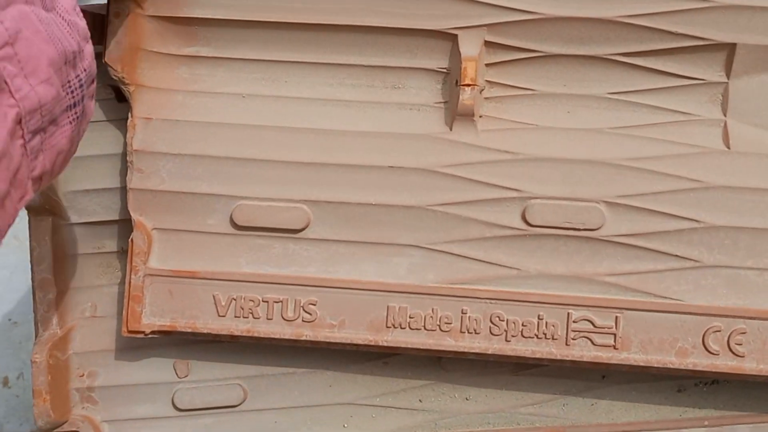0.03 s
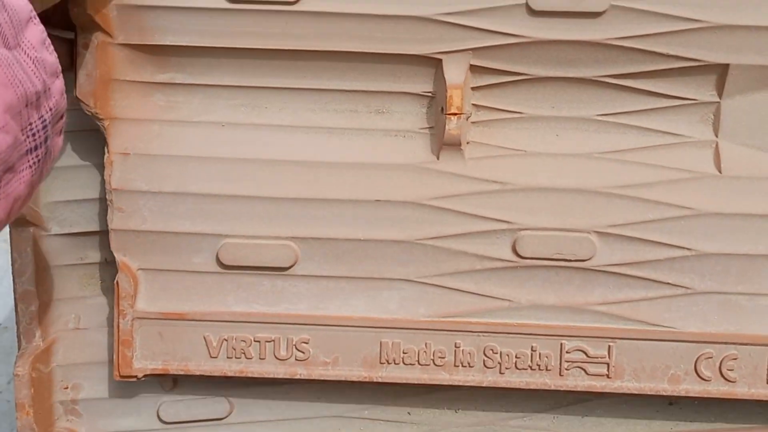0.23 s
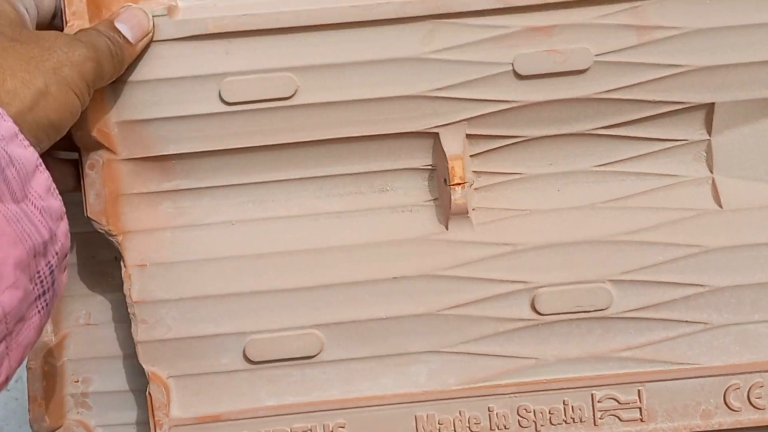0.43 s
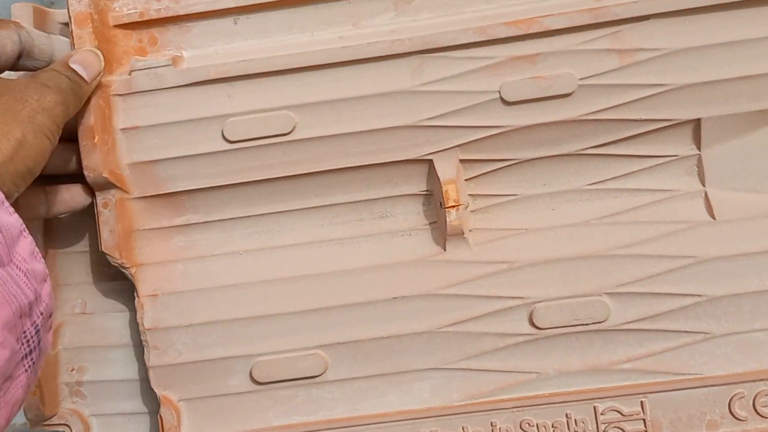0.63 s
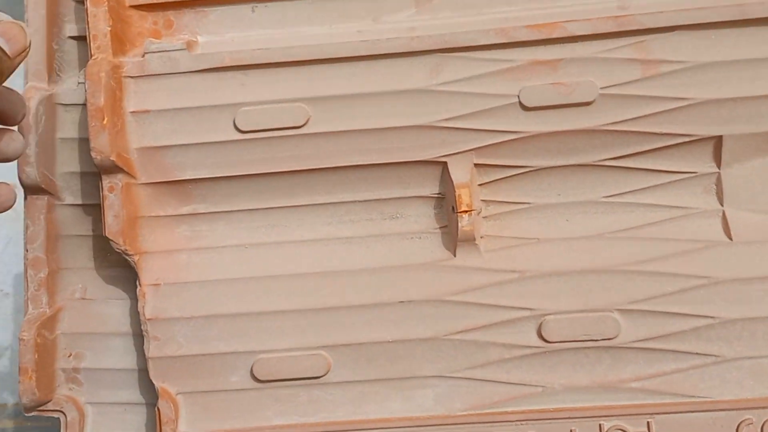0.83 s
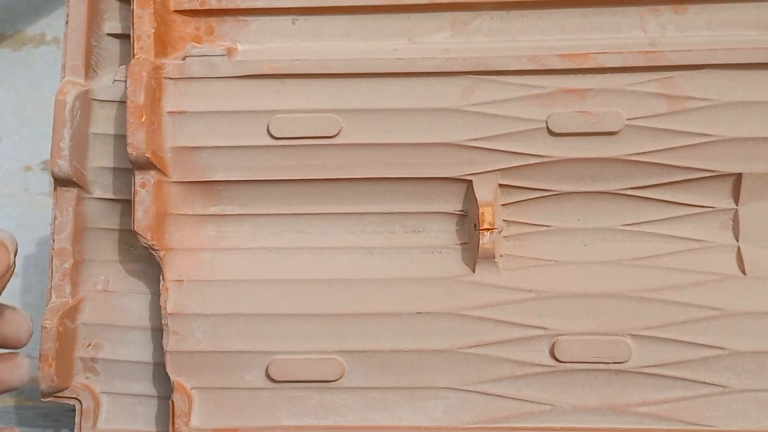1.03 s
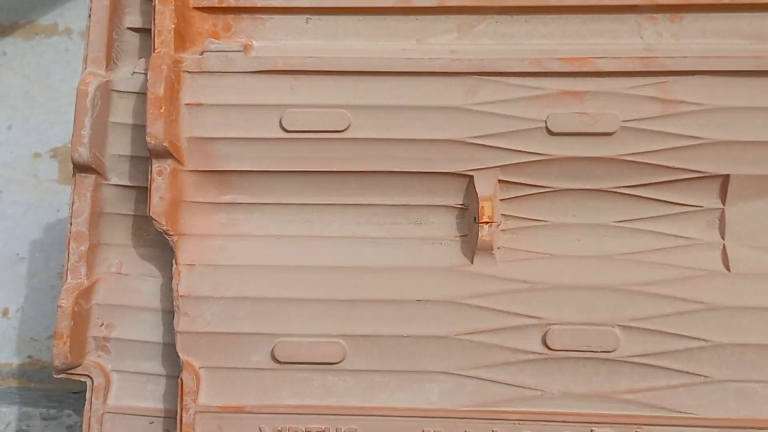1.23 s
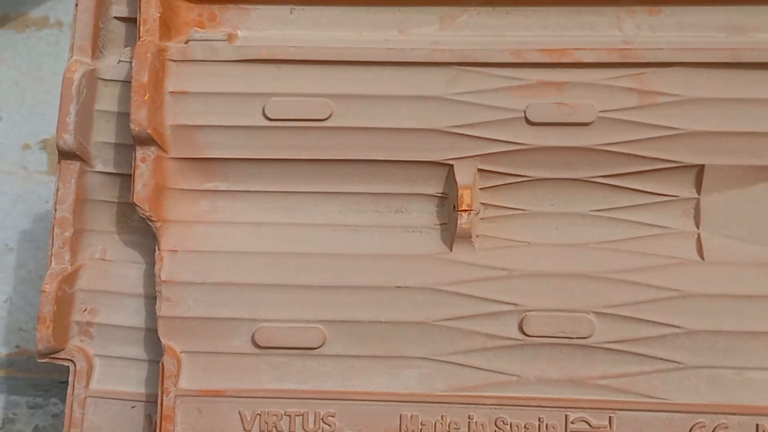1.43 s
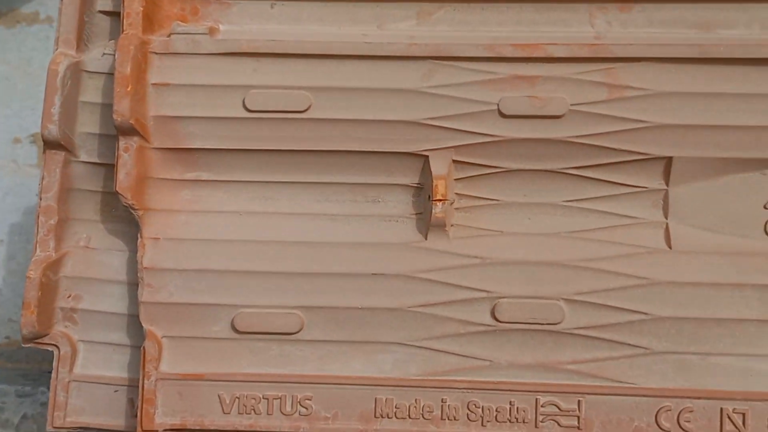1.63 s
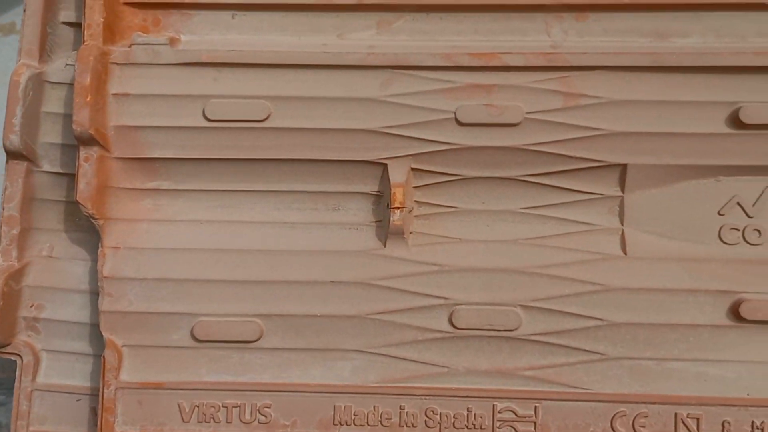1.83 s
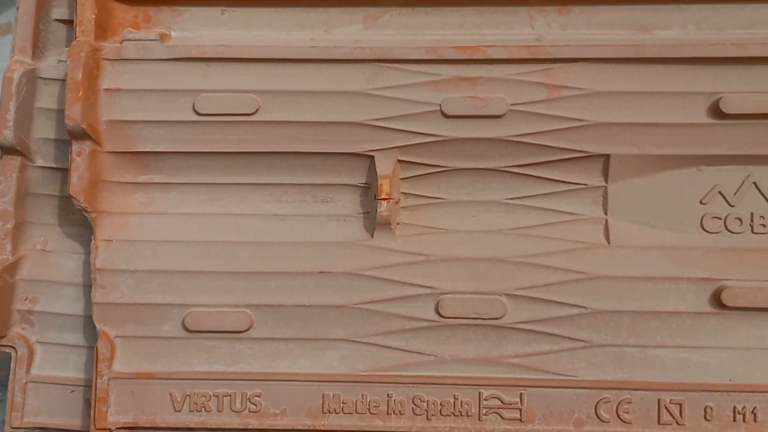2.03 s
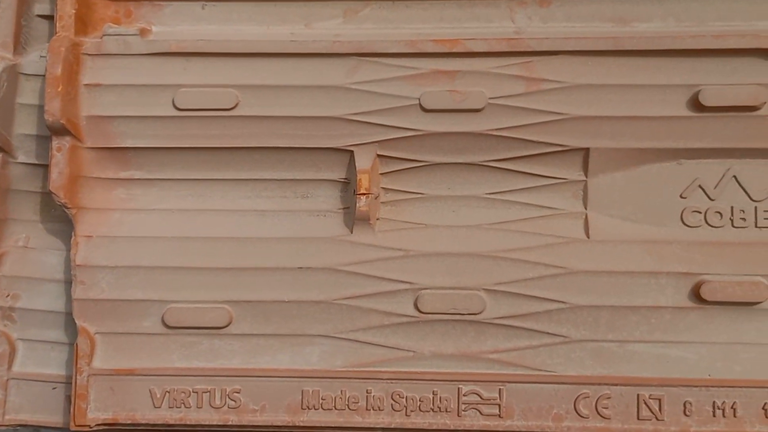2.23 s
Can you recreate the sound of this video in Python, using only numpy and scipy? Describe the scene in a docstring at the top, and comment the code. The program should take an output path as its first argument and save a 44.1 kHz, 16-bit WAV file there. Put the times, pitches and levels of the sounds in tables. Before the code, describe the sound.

Close up in a small, hard-walled room, one clay roof tile clacks down on another, drags a little, then rattles into its seat and settles with weaker knocks. Dull handling bumps and a faint rumble lie underneath.

```python
"""In a small hard room, a clay roof tile is lowered onto another, close by.
After a faint squeak it knocks, drags briefly, clatters into its seat and rocks to rest.
Each contact clacks and rings the modes of both tiles; edges tick and grains catch in the slide.
Soft handling thuds, a low room rumble and a faint hiss lie underneath."""
import sys
import numpy as np
from scipy import signal
from scipy.fft import rfft, irfft
from scipy.io import wavfile
from scipy.ndimage import uniform_filter1d, minimum_filter1d

SR = 44100
rng = np.random.default_rng(int(sys.argv[2]) if len(sys.argv) > 2 else 0)


def int16_out(signal):
    """Quantize to a 16-bit WAV file."""
    q = np.round(np.clip(np.atleast_2d(signal).T, -1, 1) * 32767)
    wavfile.write(sys.argv[1], SR, q.astype(np.int16))


N = 101429


def undb(db):
    """Decibels to gain."""
    return 10 ** (np.asarray(db) / 20)


def unit(x):
    """Scale to rms 1."""
    return x / np.sqrt(np.mean(x ** 2))


def fade(t, t60_s):
    """Exponential decay, 60 dB down at t60_s."""
    return np.exp(-np.log(1000) * t / t60_s)


def curve(points):
    """Gain over time from (s, dB) points."""
    return undb(np.interp(np.arange(N) / SR, *np.array(points).T))


def on_bins(hz, values):
    """Interpolate over log frequency, one value per FFT bin."""
    return np.interp(np.log(np.fft.rfftfreq(N, 1 / SR) + 1e-9), np.log(hz), values)


def colour(x, points):
    """Minimum-phase filter from (Hz, dB) points; white noise keeps its power."""
    magnitude = unit(undb(on_bins(*np.array(points).T)))
    cepstrum = irfft(np.log(magnitude), N)
    cepstrum[1:N // 2] *= 2
    cepstrum[N // 2:] = 0
    return irfft(rfft(x) * np.exp(rfft(cepstrum)), N)


def pan(left_db):
    """Stereo gains, left over right by left_db."""
    return undb(np.array([[left_db], [-left_db]]) / 2)


def diffuse(right_lag_s=0.00035, spread_hz=1100):
    """Stereo noise: alike but delayed in the bass, unrelated in the treble."""
    hz = np.fft.rfftfreq(N, 1 / SR)
    left, other = rfft(rng.standard_normal((2, N)))
    coherence = 1 / (1 + (hz / spread_hz) ** 2)
    right = coherence * left + np.sqrt(1 - coherence ** 2) * other
    delay = np.exp(-2j * np.pi * hz * right_lag_s)
    return irfft(np.array([left, right * delay]), N)


def add(out, start_s, sound):
    """Mix sound into out at start_s."""
    i = int(start_s * SR)
    n = min(sound.shape[-1], N - i)
    out[:, i:i + n] += sound[..., :n]


def knocks():
    """Each contact clacks and rings both tiles, with its own brightness and ring decay rate."""
    # Each row: start in s, clack, upper ring and lower ring in dB, cutoff in Hz, damping in dB/s.
    contacts = [(.198, -17, -13, -39.5, 2730, 21), (.206, -25.5, -27, -40, 1350, 116),
                (.217, -18, -13, -19.5, 1200, 57), (.317, -35, -43, -41, 800, 148),
                (.396, -32, -42.5, -32.5, 1200, 61.5), (.457, -41.5, -36, -45, 900, 150.5),
                (.500, -17, -26, -17.5, 1400, 59), (.523, -18.5, -16, -15, 1840, 280.5),
                (.563, -18.5, -12, -24, 2120, 170), (.590, -32.5, -31, -9, 900, 271),
                (.678, -17, -23.5, -14.5, 1585, 140), (.698, -21.5, -29, -11, 900, 257.5),
                (.725, -24, -28.5, -24.5, 1400, 161.5), (.748, -47.5, -46.5, -11.5, 850, 235),
                (.821, -50, -57.5, -31, 1500, 389), (.901, -46, -55, -40, 1100, 71),
                (.953, -20, -29.5, -15.5, 1250, 32), (1.075, -35.5, -40.5, -34, 650, 32),
                (1.103, -43, -64, -31.5, 900, 60.5), (1.182, -36.5, -35, -30, 763, 80),
                (1.278, -35, -41, -30, 846, 39), (1.368, -41, -41.5, -31, 740, 40),
                (1.550, -59.5, -81.5, -61.5, 600, 81.5)]
    # Tile modes. Each row: frequency in Hz, level in dB, T60 in s.
    upper_modes = [(247.7, -20.5, 0.41), (486.1, 2, 0.18), (539, -15, .28), (612, -9.5, 0.44),
                   (743.5, 1.5, 0.12), (799.3, 1, .17), (859, -7.5, .15), (888, -3, 0.25), (974.5, -6, 0.2),
                   (1014, -1, 0.1), (1194, -6, .19), (1394, -7.5, .16), (1512, -8, 0.85), (1587, -7, .15),
                   (1848, -13, .15), (2188, -4, 0.2), (3180, -5.5, 0.072)]
    lower_modes = [(226.6, -14, 0.53), (292.7, -18, 0.8), (410.2, -17, 0.26), (474.2, -3.5, 0.11),
                   (507.2, -4, 0.23), (562, -4, 0.2), (637.5, -5, 0.48), (661.5, 6.5, 0.28),
                   (808, -16, 0.079), (861, -12.5, 0.19), (1105, -18.5, 0.12), (1300, -20.5, 0.18),
                   (1450, -20.5, 0.19), (1523, -21.5, 0.44)]
    upper = tile_ring(upper_modes, swell_s=0.0056, right_lag_s=0.0003)
    lower = tile_ring(lower_modes, swell_s=0.0073, right_lag_s=0.000066)
    corners = [clack() for _ in range(4)]
    out, t = np.zeros((2, N)), np.arange(SR) / SR
    for k, (start_s, clack_db, upper_db, lower_db, cutoff_hz, damping_db_per_s) in enumerate(contacts):
        ring = undb(upper_db) * upper + undb(lower_db) * lower
        knock = undb(clack_db) * corners[k % 4] + ring * undb(-damping_db_per_s * t)
        lowpass = signal.butter(4, cutoff_hz, fs=SR)
        add(out, start_s, signal.lfilter(*lowpass, knock))
    return out * pan(left_db=2.5)


def tile_ring(modes, swell_s, right_lag_s):
    """One second of a tile's modes, each starting at its own phase, building up in the room and decaying."""
    t = np.maximum(np.arange(SR) / SR - np.array([[0], [right_lag_s]]), 0)
    ring = sum(undb(db) * fade(t, t60_s) * np.sin(2 * np.pi * hz * t + k ** 2)
               for k, (hz, db, t60_s) in enumerate(modes))
    return (1 - np.exp(-t / swell_s)) * ring


def clack(crack_s=0.009, crack_db=-5, hold_s=0.028):
    """Dense part of a knock: a crack, a cluster of near reflections, then the room tail."""
    # Each row: frequency in Hz, relative density in dB.
    clack_spectrum = [(30, -39.5), (55, -35), (100, -12.5), (170, -10.5), (250, -5), (360, -9), (500, 6.5),
                      (850, 0), (1400, -3.5), (2300, -9), (3300, -14), (4600, -22), (8000, -26.5),
                      (15000, -36)]
    # Each row: band centre in Hz, level re the reflections in dB, T60 in s.
    room_bands = [(102.44, -3, 1.0), (260, -6.5, .7), (580, -10, 0.31), (1500, -12.5, 0.52),
                  (3466, -15, .36), (10000, -15, .35)]
    t = np.arange(N) / SR
    crack = undb(crack_db) * np.exp(-t / crack_s)
    reflections = fade(np.maximum(t - hold_s, 0), t60_s=0.13)
    early = diffuse() * (crack + reflections)
    noise_bins = rfft(diffuse())
    centres_hz = np.array(room_bands)[:, 0]
    tail = sum(irfft(noise_bins * on_bins(centres_hz, band), N) * undb(db) * fade(t, t60_s)
               for band, (_, db, t60_s) in zip(np.eye(len(room_bands)), room_bands))
    return colour(early + tail, clack_spectrum)[:, :SR]


def edge_ticks():
    """Sharp edges meet in short, bright noise bursts."""
    # Each row: start in s, level in dB.
    ticks = [(.198, -55.5), (.501, -58), (.527, -77), (.551, -62.5), (.564, -42)]
    # Each row: frequency in Hz, relative density in dB.
    tick_spectrum = [(500, -25.5), (2500, 7.5), (5000, 6), (8500, -5), (10500, 1.5), (15000, -3.5)]
    out, t = np.zeros((2, N)), np.arange(SR // 2) / SR
    for start_s, db in ticks:
        add(out, start_s, undb(db) * fade(t, t60_s=0.06) * rng.standard_normal((2, len(t))))
    return colour(out, tick_spectrum)


def scrape(grains_per_s=2000, scatter_db=2):
    """Grains catch at random as the tile slides, each a brief burst of noise."""
    # Sliding effort. Each row: time in s, level in dB.
    effort = [(.2, -75), (.23, -54.5), (.29, -51), (.35, -64), (.375, -48.5), (.41, -44.5), (.44, -51.5),
              (.465, -53.5), (.49, -70), (.53, -42.5), (.63, -50), (.655, -54), (.74, -55.5), (.77, -57.5),
              (.84, -84), (.95, -100)]
    # Each row: frequency in Hz, relative density in dB.
    scrape_spectrum = [(150, -4.5), (600, 6), (1400, -3.5), (2400, -6), (4200, -13.5), (6500, -24.5),
                       (10000, -26.5), (15000, -27.5)]
    grains = (rng.random(N) < grains_per_s / SR) * undb(scatter_db * rng.standard_normal(N))
    decay = fade(np.arange(SR // 2) / SR, t60_s=0.014)
    power = np.abs(signal.fftconvolve(grains ** 2, decay ** 2)[:N])
    friction = unit(np.sqrt(power)) * curve(effort) * rng.standard_normal((2, N))
    return colour(friction, scrape_spectrum)


def squeak(waver_hz=90):
    """Faint, unsteady whistle that sags before the first knock."""
    # Each row: time in s, pitch in Hz, level in dB.
    glide = [(.06, 3500, -100), (.1, 3500, -71), (0.159, 3450, -68), (0.192, 3274, -73.5),
             (0.209, 3330, -120)]
    times_s, hz, db = np.array(glide).T
    pitch_hz = np.interp(np.arange(N) / SR, times_s, hz)
    phase = 2 * np.pi * np.cumsum(pitch_hz) / SR
    lowpass = signal.butter(2, waver_hz, fs=SR)
    waver = unit(signal.lfilter(*lowpass, rng.standard_normal((2, N))))
    return curve(list(zip(times_s, db))) * waver * np.sin(phase)


def handling(rise_s=0.014, roughness=0.63):
    """Dull thuds and a low rustle of handling, mostly on the left."""
    # Each row: start in s, level in dB, pitch in Hz, left over right in dB.
    thuds = [(.362, -42, 72.4, 9.5), (.440, -36, 72.7, 17.5), (.575, -44, 86, 3), (.675, -50.5, 46.2, 0),
             (1.565, -52.5, 80, 6.5), (1.962, -54, 85, 16), (1.985, -44.5, 69, 7.5),
             (2.075, -49, 100, 11.5), (2.130, -55, 75.3, 19), (2.192, -49, 105, 20.5),
             (2.238, -45, 84.3, 19), (2.272, -42.5, 82.6, 17.5)]
    # Each row: time in s, level in dB.
    rustle_levels = [(0, -62.5), (.2, -62.5), (1.5, -71.5), (1.9, -80.5), (1.98, -56.5), (2.17, -58.5),
                     (2.3, -53)]
    # Each row: frequency in Hz, relative density in dB.
    rustle_spectrum = [(25, -16.5), (70, 5), (200, 4.5), (320, -8.5), (700, -24), (1500, -39.5),
                       (4000, -51), (15000, -56.5)]
    out, t = np.zeros((2, N)), np.arange(SR // 4) / SR
    swell = (t / rise_s * np.exp(1 - t / rise_s)) ** 2
    rustle = unit(colour(rng.standard_normal((2, N)), rustle_spectrum))
    for k, (start_s, db, hz, left_db) in enumerate(thuds):
        rough = np.roll(rustle, k * len(t) // 2, axis=1)[:, :len(t)]
        thud = swell * (np.sin(2 * np.pi * hz * t) + roughness * rough)
        add(out, start_s, undb(db) * pan(left_db) * thud)
    return out + rustle * curve(rustle_levels) * pan(left_db=7.5)


def room_rumble():
    """Low diffuse noise that swells and ebbs."""
    # Each row: time in s, level in dB.
    rumble_levels = [(0, -54), (.18, -54), (.3, -46), (.87, -59), (1.08, -47.5), (1.4, -52.5), (1.65, -62),
                     (1.88, -62), (2.3, -59)]
    # Each row: frequency in Hz, relative density in dB.
    rumble_spectrum = [(20, -37.5), (45, -34), (70, -10), (98, 0), (150, -13), (230, -5), (300, -3.5),
                       (380, -17), (650, -12), (1000, -23.5), (2500, -46.5), (6000, -60.5), (15000, -63)]
    return curve(rumble_levels) * unit(colour(diffuse(), rumble_spectrum))


def scene(hiss_db=-87):
    """Tiles and handling over room rumble and hiss."""
    rumble = room_rumble()
    tiles = knocks() + (edge_ticks() + scrape()) * pan(left_db=14.5) + squeak()
    return tiles + handling() + rumble + undb(hiss_db) * rng.standard_normal((2, N))


def record(dry, cutoff_hz=15600, ceiling=0.95, window_s=0.0068):
    """Steep low-pass, then a fast peak limiter."""
    x = signal.sosfilt(signal.ellip(10, .1, 80, cutoff_hz, fs=SR, output="sos"), dry)
    width = int(window_s * SR)
    gain = 1 / np.maximum(np.abs(x).max(axis=0) / ceiling, 1)
    return x * uniform_filter1d(minimum_filter1d(gain, width), width)


dry = scene()
out = record(dry)
int16_out(out)
```